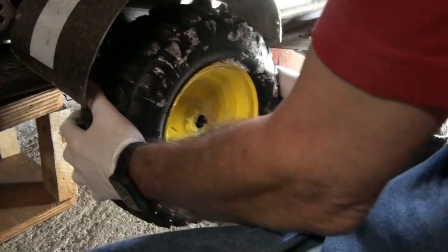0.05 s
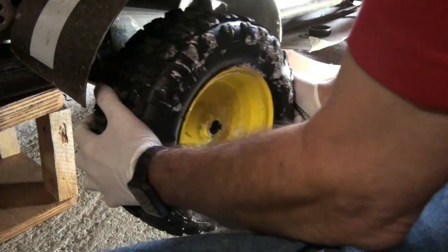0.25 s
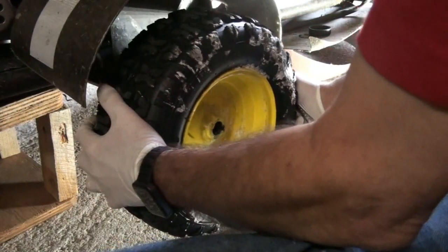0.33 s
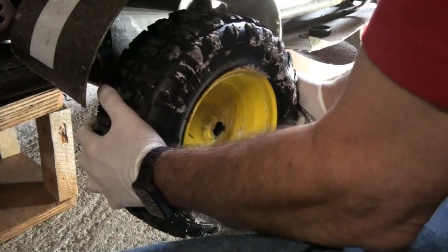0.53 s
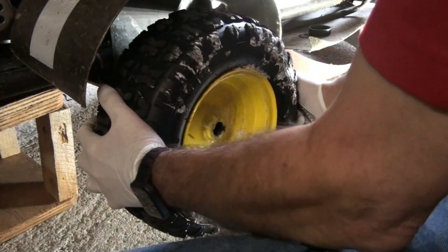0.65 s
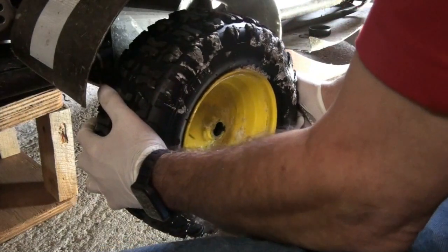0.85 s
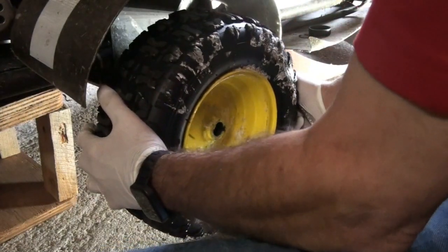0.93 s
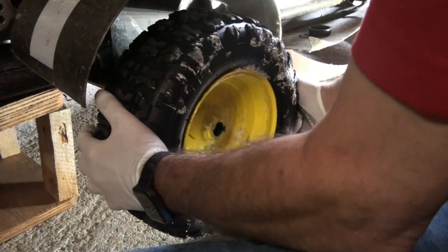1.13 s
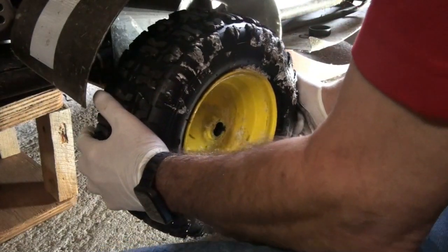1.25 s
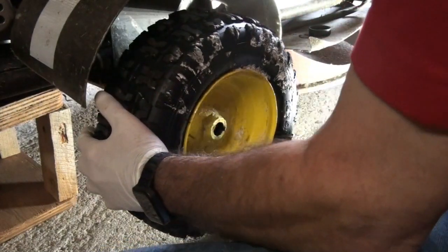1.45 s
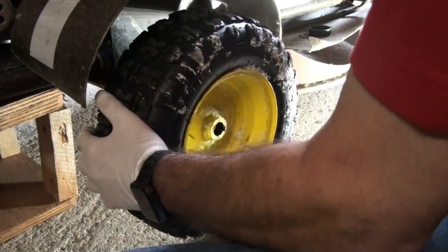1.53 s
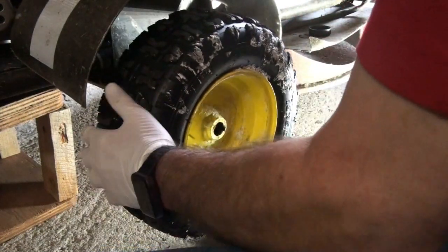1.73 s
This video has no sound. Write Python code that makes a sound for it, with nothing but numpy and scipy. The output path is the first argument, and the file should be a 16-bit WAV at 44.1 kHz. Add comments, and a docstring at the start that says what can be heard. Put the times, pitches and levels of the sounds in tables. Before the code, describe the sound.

Sharp, high metal clinks sound close by in a workshop: a small part rattles in a wheel rim, bounces on the concrete floor, then skids and jingles again. The tyre bumps softly over a faint hum.

```python
"""A small steel part comes off the hub of a wheel, close to the microphone in a workshop.
It scrapes on the axle, strikes the hub, rattles in the rim, drops on the gritty concrete floor,
tumbles and is jostled again. Two close, high modes ring after every contact and throb as it turns.
Grit ticks, the tyre bumps softly and a faint hum fills the room."""
import sys
import numpy as np
from scipy import signal
from scipy.fft import rfft, irfft
from scipy.io import wavfile

SR = 44100
rng = np.random.default_rng(int(sys.argv[2]) if len(sys.argv) > 2 else 0)


def master_out(mix):
    """Clip the mix to full scale and print it as 16-bit PCM to the path in sys.argv[1]."""
    frames = np.transpose(np.atleast_2d(mix))
    ceiling = np.clip(frames, -1, 1)
    pcm = np.round(ceiling * 32767).astype(np.int16)
    wavfile.write(sys.argv[1], SR, pcm)


N = 79380


def undb(db):
    """Decibels to gain."""
    return 10 ** (np.asarray(db) / 20)


def age(start):
    """Seconds since an event, zero before it."""
    return np.maximum(np.arange(N) / SR - start, 0)


def fade(start, t60):
    """Sudden onset, then a fall of 60 dB every t60 seconds."""
    return (age(start) > 0) * np.exp(-np.log(1000) * age(start) / t60)


def curve(rows):
    """Gain along (s, dB) points."""
    return undb(np.interp(age(0), *np.array(rows).T))


def colour(x, points, size=2048):
    """Minimum-phase filter of unit power through (Hz, dB) points."""
    hz, db = np.array(points).T
    bins_hz = np.maximum(np.fft.rfftfreq(size, 1 / SR), 1)
    shape_db = np.interp(np.log(bins_hz), np.log(hz), db)
    cepstrum = irfft(np.log(undb(shape_db)))
    cepstrum[1:size // 2] *= 2
    cepstrum[size // 2 + 1:] = 0
    impulse = irfft(np.exp(rfft(cepstrum)))
    return signal.fftconvolve(x, impulse / np.linalg.norm(impulse))[:N]


def grains(per_s, spread_db):
    """Dense random clicks of uneven size, at rms 1."""
    clicks = (rng.random(N) < per_s / SR) * rng.standard_normal(N)
    clicks *= undb(spread_db * np.minimum(rng.exponential(size=N), 2))
    return clicks / np.sqrt(np.mean(clicks ** 2))


def bursts(rows, t60, snap=8):
    """A snap and a few milliseconds of crushed grit at each (s, dB)."""
    out, t = np.zeros(N), np.arange(SR // 20) / SR
    for start, db in rows:
        burst = rng.standard_normal(len(t)) * np.exp(-np.log(1000) * t / t60)
        burst[0] = snap
        at = int(start * SR)
        out[at:at + len(t)] += undb(db) * burst[:N - at]
    return out


def struck(modes, hits):
    """Decaying modes (Hz, dB, t60) set off by each blow (s, dB)."""
    return sum(undb(db + hit_db) * fade(start, t60) * np.sin(2 * np.pi * hz * age(start))
               for hz, db, t60 in modes for start, hit_db in hits)


# Room tone. Each row: frequency in Hz, relative level in dB.
AIR_COLOUR = [(25, -7.5), (60, -2.5), (130, -1), (250, -4.5), (500, -11), (1000, -12), (2000, -17),
              (4000, -19.5), (8000, -21.5), (12000, -28), (16000, -24)]
# The wavering of the hum. Each row: time in seconds, level in dB.
HUM_LEVEL = [(0, -56), (.45, -56.5), (.65, -61.5), (.9, -61.5), (1.05, -51), (1.38, -66), (1.5, -50),
             (1.65, -53), (1.8, -48)]


def workshop_air(noise_db=-54, width=.36, hum_hz=120.7):
    """Quiet workshop noise all around the microphone, with a hum in the centre."""
    mid, side = (colour(rng.standard_normal(N), AIR_COLOUR) for _ in range(2))
    hum = curve(HUM_LEVEL) * np.sin(2 * np.pi * hum_hz * age(0))
    return undb(noise_db) * (mid + width * side * np.array([[1], [-1]])) + hum


# Scraping on the axle. Each row: time in seconds, relative level in dB.
SCRAPE_LEVEL = [(0, -17.5), (.06, -18), (.1, -6.5), (.19, -8.5), (.26, -4), (.3, 0.5), (.325, -4),
                (.35, -13), (.45, -17), (.8, -32)]
# Tone of the scrape. Each row: frequency in Hz, relative level in dB.
SCRAPE_TONE = [(40, -41), (170, -2), (400, -16), (600, 13), (1100, 3), (2500, -6.5), (4000, -13.5),
               (6500, -15.5), (10000, -15.5), (16000, -38)]
# Modes of the wheel rim. Each row: frequency in Hz, relative level in dB, t60 in seconds.
RIM_MODES = [(560, -1, 0.13), (643, -8, 0.31), (721, -16, 0.6), (830, -13.5, 0.36), (1048, -5.5, 0.17),
             (1237, -10.5, 0.3), (1828, -1, 0.1), (1900, 3.5, 0.13), (2020, 0, 0.18)]


def axle_scrape(scrape_db=-37, rim_db=-38, soften_hz=610):
    """Steel rubs along the axle and makes the low modes of the rim sing."""
    rub = grains(per_s=2500, spread_db=1.5) * curve(SCRAPE_LEVEL)
    rim = signal.lfilter(*signal.butter(2, soften_hz, fs=SR), struck(RIM_MODES, [(0, 0)]))
    singing = signal.fftconvolve(rub, rim / np.linalg.norm(rim))[:N]
    return undb(rim_db) * singing + undb(scrape_db) * colour(rub, SCRAPE_TONE)


# Tone of a knock on the wheel. Each row: frequency in Hz, relative level in dB.
NUDGE_COLOUR = [(60, -10), (250, 9.5), (700, -4.5), (1300, -6), (2200, -28), (6000, -29), (16000, -31)]


def nudge(db=-33):
    """One dull knock as the wheel is handled."""
    return undb(db) * colour(rng.standard_normal(N) * fade(start=.039, t60=.055), NUDGE_COLOUR)


# Contacts of the part. Each row: start in seconds, relative levels in dB of knock, crack, lower mode
# and upper mode, t60 of the lower mode in seconds, depth of tumbling from 0 to 1.
PART_CONTACTS = [(.162, -38, -45, -61, -50, 0.54, 0.1), (.2117, -19, -26, -25, -10.5, 0.27, 0.17),
                 (.264, -19, -36, -25, -33, 0.12, 0), (.273, -22.5, -16, -16.5, -14, 0.13, 0.56),
                 (.2855, -25.5, -41, -17, -14.5, 0.85, 0), (.3052, -23, -16.5, -15, -17, 0.37, 0),
                 (.3785, -25.5, -29.5, -31, -30.5, 1.15, 1), (.5205, -22, -21.5, -15, -9, 1.07, 0.71),
                 (0.6724, -24.5, -36, -21, -23, 1, 0.59), (.76, -37.5, -41, -25, -23, 0.49, .4),
                 (.918, -33.5, -48, -35, -31.5, 1.7, 0.1), (.957, -36.5, -42.5, -43, -49, 0.58, 0),
                 (1.067, -37.5, -60, -38.5, -28.5, 1.03, 0.55), (1.1785, -41, -38.5, -23, -28, 0.98, 0.37),
                 (1.196, -36, -32, -23.5, -18.5, .8, 0.7), (1.2205, -39, -28, -20, -15.5, 0.58, 0),
                 (1.255, -37, -25, -22.5, -14.5, 0.37, 0), (1.2924, -45, -32, -17, -24, 0.24, 0),
                 (1.3264, -42.5, -41, -27.5, -21.5, 0.47, 0.7), (1.39, -34, -30, -17, -26, .4, 0.08),
                 (1.4105, -39.5, -36, -19, -22.5, 0.39, 0), (1.4435, -38, -31, -24, -15, 0.72, 0.56),
                 (1.4885, -38.5, -37.5, -18, -24.5, 0.48, 0.34)]


def part_ringing(db=.5, contact_s=.002):
    """Each contact stops the old ring and starts a new one; the modes throb as the part turns over."""
    out = np.zeros(N)
    ends = [row[0] for row in PART_CONTACTS[1:]] + [N / SR]
    mode_hz, decay_shares, nulls_per_s = (7498, 7827), (1, .68), (21.66, 18.8)
    for mode, (hz, share, rate) in enumerate(zip(mode_hz, decay_shares, nulls_per_s)):
        # A slow wander keeps the throb and the pitch uneven.
        sway = .17 * np.interp(age(0), np.linspace(0, N / SR, 50), rng.standard_normal(50))
        for (start, _, _, *mode_db, t60, tumble), end in zip(PART_CONTACTS, ends):
            t = age(start)
            held = (1 - np.exp(-t / contact_s)) * np.exp(-age(end) / contact_s)
            facing = 1 - tumble * (1 - np.abs(np.sin(np.pi * (rate * t + sway))))
            tone = np.sin(2 * np.pi * (hz * t + rng.random() + tumble * sway))
            out += undb(mode_db[mode] + db) * held * facing * fade(start, t60 * share) * tone
    return out


# Grit under part and tyre. Each row: start in seconds, relative levels in dB of knock and crack.
GRIT_TICKS = [(0.2057, -27.5, -55), (0.3207, -29.5, -39), (0.3326, -36, -50), (.794, -40, -64),
              (0.816, -46, -56), (0.844, -44, -64), (0.873, -53, -58), (0.886, -39, -54),
              (0.9747, -38.5, -43), (1.0228, -39.5, -59), (1.0435, -39.5, -54), (1.0919, -39.5, -62),
              (1.11, -44, -63), (1.1633, -44, -53), (1.231, -39, -29), (1.24, -44, -33), (1.308, -44, -39),
              (1.3461, -43, -39), (1.4478, -36.5, -31), (1.5035, -47, -37), (1.5465, -44.5, -52),
              (1.6536, -54, -44), (1.6746, -55, -49), (1.693, -44.5, -59)]
# The dull and the bright side of a touch. Each row: frequency in Hz, relative level in dB.
KNOCK_COLOUR = [(100, -29), (300, -13), (900, -9), (1500, -4.5), (2100, -1.5), (2550, 0.5), (3050, -2),
                (3950, 3.5), (4800, -3.5), (6000, -5.5), (8500, -0.5), (16000, -39.5)]
CRACK_COLOUR = [(100, -76), (4000, -18), (7000, 7), (9000, 7.5), (10500, 4), (12500, -0.5), (14000, -11.5),
                (16000, -14)]


def touches(knock_db=-3, crack_db=-1):
    """Every contact of the part and tick of grit gives a dull knock and a bright crack."""
    rows = PART_CONTACTS + GRIT_TICKS
    knock = undb(knock_db) * bursts([(start, db) for start, db, *_ in rows], t60=.019)
    crack = undb(crack_db) * bursts([(start, db) for start, _, db, *_ in rows], t60=.024)
    return colour(knock, KNOCK_COLOUR) + colour(crack, CRACK_COLOUR)


# Modes of the hub. Each row: frequency in Hz, relative level in dB, t60 in seconds.
HUB_MODES = [(3570, -26, 0.041), (3740, -17, 0.033), (4000, -44, 0.13), (4020, -24, 0.039),
             (12400, -39, 0.039)]
# Blows on the hub and on the rim. Each row: start in seconds, relative level in dB.
HUB_BLOWS = [(0.2135, 1), (1.674, -30)]
RIM_BLOWS = [(0.2049, -40.5), (0.2644, -35), (0.2855, -37.5), (.299, -33.5), (.379, -47)]


def wheel_blows():
    """Struck by the part, the hub pings briefly and the rim rings lower and longer."""
    return struck(HUB_MODES, HUB_BLOWS) + struck(RIM_MODES, RIM_BLOWS)


# Landings on the floor. Each row: start in seconds, relative level in dB.
FLOOR_HITS = [(.5208, -24.5), (.672, -30)]
# Tone of steel on concrete. Each row: frequency in Hz, relative level in dB.
FLOOR_COLOUR = [(80, -25), (250, -3), (500, -9), (1050, -0.5), (1500, -2.5), (2500, -3), (3300, -5.5),
                (4800, -24), (6000, 2.5), (8000, -8.5), (16000, -50)]


def landings():
    """The part drops on concrete with a short, full clack."""
    return colour(bursts(FLOOR_HITS, t60=.014), FLOOR_COLOUR)


# Bumps of the tyre. Each row: start in seconds, level in dB, pitch in Hz, t60 in seconds.
TYRE_BUMPS = [(.73, -52, 63, 0.67), (0.841, -29.5, 54.8, 0.24), (1.134, -44.5, 67, 0.28),
              (1.167, -32.5, 61, 0.063), (1.708, -37.5, 58, 0.14)]


def tyre(rise_s=.0048, rumble=.65):
    """Damped rubber bumps, each a low tone roughened by rumble."""
    rubber_colour = [(20, -1), (45, -9), (100, -3), (200, -17), (600, -59), (3000, -71)]
    rough = rumble * colour(rng.standard_normal(N), rubber_colour)
    out = np.zeros(N)
    for start, db, hz, t60 in TYRE_BUMPS:
        envelope = undb(db) * fade(start, t60) * (1 - np.exp(-age(start) / rise_s))
        out += envelope * (np.sin(2 * np.pi * hz * age(start)) + rough)
    return out


# The part skidding over grit. Each row: time in seconds, level in dB.
SKID_LEVEL = [(1.17, -86), (1.21, -42.5), (1.24, -59), (1.3, -43.5), (1.36, -53), (1.42, -65), (1.46, -53),
              (1.53, -53.5), (1.6, -62), (1.67, -54), (1.8, -64)]


def skid(dull_db=-8):
    """Gritty crackle of steel dragged over the floor, mostly bright."""
    drag = grains(per_s=1100, spread_db=1) * curve(SKID_LEVEL)
    return colour(drag, CRACK_COLOUR) + undb(dull_db) * colour(drag, KNOCK_COLOUR)


def room(x, width=.65):
    """Near reflections from wheel and floor, then the short tail of the workshop."""
    def tail(start, t60, db):
        noise = rng.standard_normal((2, N)) * fade(start, t60)
        return undb(db) * noise / np.linalg.norm(noise, axis=1, keepdims=True)
    echoes = tail(start=.0012, t60=.04, db=-13) + tail(start=.006, t60=.21, db=-9)
    mid, side = signal.fftconvolve(x[None], echoes, axes=1)[:, :N]
    return mid + width * side * np.array([[1], [-1]])


def scene(left_db=.3, ring_send=.4):
    """Part and wheel close to a stereo microphone, almost centred, with the workshop behind."""
    ring = part_ringing()
    clatter = touches() + landings() + axle_scrape() + nudge() + wheel_blows() + skid() + tyre()
    pan = undb(np.array([[left_db], [-left_db]]) / 2)
    return (ring + clatter) * pan + room(clatter + ring_send * ring) + workshop_air()


def record(dry):
    """The recorder cuts the treble steeply above 16 kHz."""
    return signal.sosfilt(signal.ellip(8, .2, 70, 16000, fs=SR, output="sos"), dry)


dry = scene()
out = record(dry)
master_out(out)
```